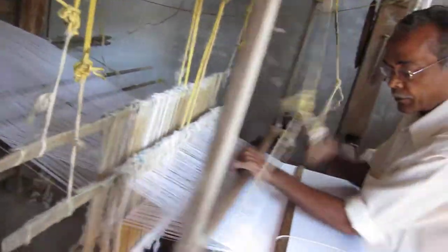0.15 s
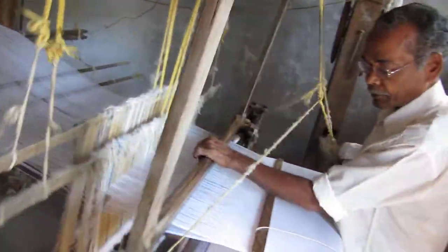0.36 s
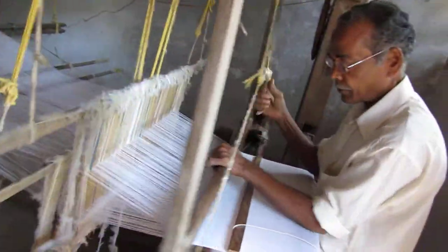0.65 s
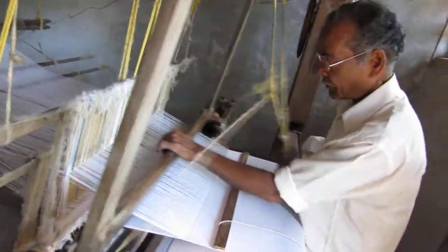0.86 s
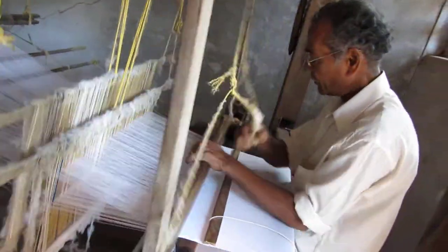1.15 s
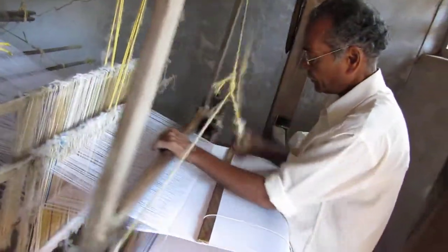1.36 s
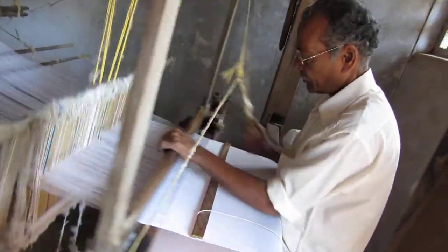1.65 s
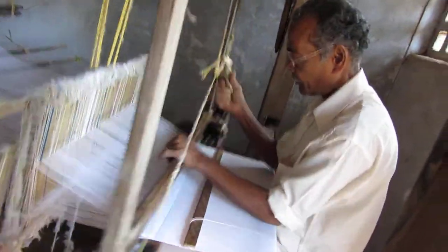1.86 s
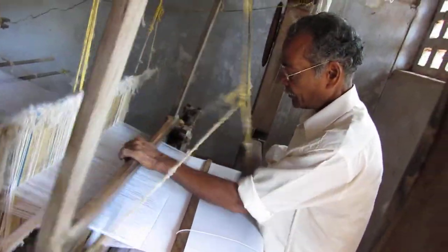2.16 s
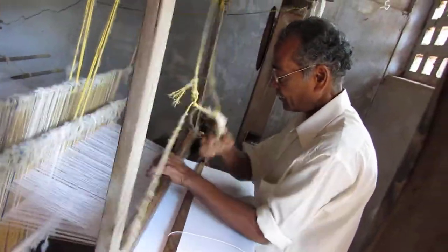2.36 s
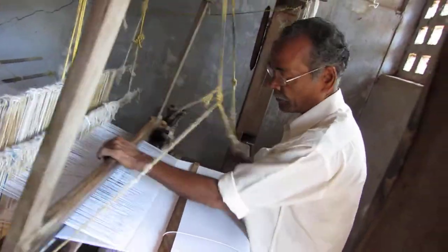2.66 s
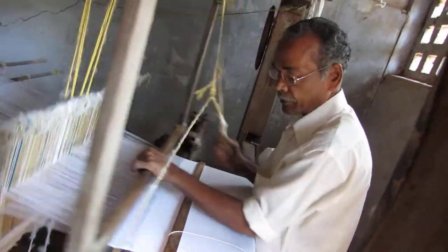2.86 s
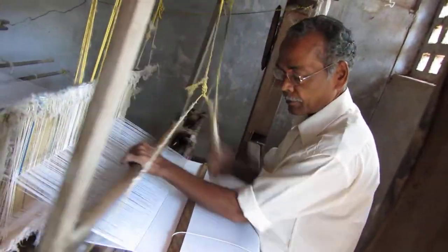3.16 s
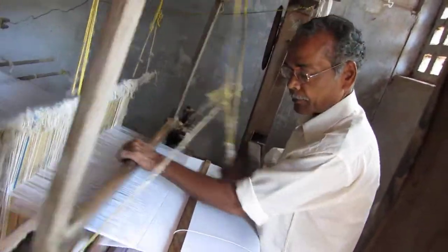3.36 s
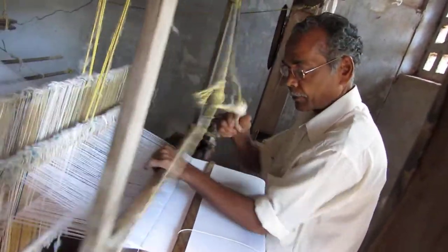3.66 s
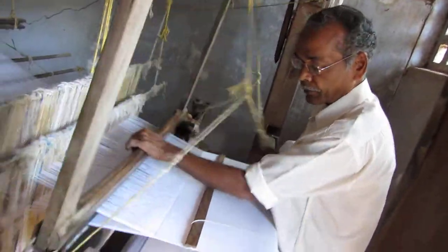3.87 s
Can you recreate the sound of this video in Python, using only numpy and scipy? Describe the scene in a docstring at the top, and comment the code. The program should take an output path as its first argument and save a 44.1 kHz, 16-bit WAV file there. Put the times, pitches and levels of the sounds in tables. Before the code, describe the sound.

Wooden handloom clacks in a steady cycle, shuttle cracking across, slamming, then rattling back

```python
"""A wooden fly-shuttle handloom in a small hard-walled room, one round trip of the shuttle every 1.2 s.
The picker cracks the shuttle across; it slams into the far box, which rings on.
The return throw knocks, scrapes and rattles, ends in a dry clack, and the warp rustles after it.
Ticks, creaks and treadle bumps fall in between; low noise and a hum run throughout.
Contacts are pushes, filtered noise bursts and decaying modes; the room is noise that follows them by band."""
import sys
import numpy as np
from scipy import signal
from scipy.fft import rfft, irfft
from scipy.io import wavfile

SR = 44100
rng = np.random.default_rng(int(sys.argv[2]) if len(sys.argv) > 2 else 0)


def transcribe(signal):
    """Save signal, clipped to [-1, 1], as a 16-bit WAV file at the path in sys.argv[1]."""
    frames = np.atleast_2d(signal).T
    limited = np.clip(frames, -1, 1)
    pcm = np.round(limited * 32767).astype(np.int16)
    wavfile.write(sys.argv[1], SR, pcm)


N = 176400
T = np.arange(N) / SR

# Outward throws. Each row: time in s, level in dB, delay until the picker meets its stop in s,
# level of that stop in dB.
THROWS = [(0.233, -20.5, 0.0058, -19.5), (1.4174, -22.5, 0.0059, -22), (2.6127, -20, .0057, -23),
          (3.7972, -21, 0.0059, -20)]
# Shuttle slams into the far box. Each row: time in s, level in dB, lead of the first touch in s,
# delay until it wedges in s, level of wedging in dB, tilt in dB per octave, pitch of the box in Hz,
# level of the box ring in dB.
SLAMS = [(0.4043, -18.5, 0.0024, 0.0046, -20, -2.5, 1906, -32.5),
         (1.5883, -14.5, 0.0026, 0.0032, -19.5, 0.5, 1931, -27),
         (2.7852, -15.5, 0.0029, .007, -17, -0.5, 2085, -34),
         (3.9685, -14.5, 0.0042, 0.004, -13.5, 0, 1803, -25)]
# Shuttle rebounds in the far box. Each row: time in s, level in dB.
REBOUNDS = [(0.466, -31.5), (0.494, -32), (1.619, -23), (1.633, -29), (1.645, -31), (2.831, -36),
            (2.88, -34)]
# Shuttle lands in the home box. Each row: time in s, level in dB, lead of the first touch in s.
LANDINGS = [(1.0232, -16.5, .002), (2.2145, -17, .0024), (3.3989, -18.5, 0.0023)]
# Return throws, shuttle chattering along the race. Each row: start in s, length in s, level in dB.
RETURNS = [(.809, .105, -34), (1.996, .112, -31.5), (3.188, .11, -32.5)]
# Shuttle scrapes the reed in the return throw. Each row: time in s, level in dB.
SCRAPES = [(0.8098, -30), (0.82, -31), (0.824, -28), (0.8423, -25), (0.865, -27), (0.906, -26),
           (1.982, -33), (1.999, -27.5), (2.006, -28), (2.012, -24), (2.042, -26), (2.051, -26),
           (2.077, -24), (2.088, -24.5), (2.095, -25.5), (3.188, -25.5), (3.196, -25), (3.201, -22),
           (3.232, -26.5), (3.245, -31.5), (3.276, -27), (3.283, -28)]
# Picker and sley knocks in the return throw. Each row: time in s, level in dB, pitch in Hz.
KNOCKS = [(0.7908, -27, 1130), (0.8157, -23.5, 1190), (0.8565, -25, 1260), (0.8652, -22, 1070),
          (0.8743, -30, 1480), (1.977, -25.5, 1160), (2.0028, -20.5, 1186), (2.0502, -20, 1127),
          (2.0636, -26.5, 1700), (3.168, -25, 1100), (3.1935, -21, 1250), (3.234, -22.5, 1330),
          (3.2425, -19.5, 1160)]
# Heddle sticks and cords tick. Each row: time in s, level in dB, tilt in dB per octave.
TICKS = [(.018, -38, 4.5), (0.105, -32, 4.5), (0.116, -35, 2.5), (.307, -45, 17), (.602, -37.5, 2),
         (0.772, -38.5, 0), (1.196, -38.5, 2), (1.228, -37, -1.5), (1.315, -56, 9), (2.601, -40, 0),
         (1.255, -47, 4), (1.266, -43.5, 3), (1.954, -35, 1), (2.393, -37.5, 0.5), (2.454, -40.5, 3),
         (2.467, -42, -5.5), (2.513, -46.5, 3), (3.147, -35.5, 1.5), (3.534, -33, -1), (3.557, -35.5, 1),
         (3.581, -38.5, 2.5), (3.6642, -32, 2.5), (3.679, -41.5, 2), (3.742, -47.5, 5)]
# Brief creaks of the frame. Each row: time in s, centre in Hz, level in dB.
CREAKS = [(.108, 676, -35), (1.199, 2420, -40.5), (2.548, 423, -47), (3.543, 1250, -35.5)]
# Treadle bumps. Each row: start in s, level in dB before the rise and decay.
BUMPS = [(.115, -52), (.30, -55), (1.64, -45), (2.05, -36), (2.45, -54), (2.864, -42)]

# Spectra of the struck parts and of the noise floor. Each row: frequency in Hz, relative level in dB.
PICKER_SPECTRUM = [(30, -51), (50, -38), (90, -23.5), (200, -15.5), (330, -9), (560, -16.5), (800, -9.5),
                   (1560, -3.5), (2380, -8.5), (2950, -0.5), (4100, -13), (5500, -13), (7900, -16),
                   (12500, -32.5), (14600, -26), (16000, -51)]
FAR_BOX_SPECTRUM = [(35, -74), (80, -41), (460, -22), (690, -13), (960, -9.5), (1220, -3.5), (1630, -5),
                    (1900, 2), (2430, -13), (2650, 0), (3320, -6.5), (3790, -0.5), (4150, -7.5),
                    (6100, -4.5), (9000, -15), (12000, -26.5), (14500, -31), (16000, -45)]
HOME_BOX_SPECTRUM = [(47, -52), (80, -35), (270, -16.5), (520, -21.5), (900, -2), (1200, -1.5), (1450, 0),
                     (1860, 2), (2450, -1), (3100, -2), (4140, -7.5), (7700, -11.5), (10700, -21.5),
                     (12000, -42), (14300, -28), (16000, -26)]
SLEY_SPECTRUM = [(47, -87), (80, -29), (136, -16), (242, -20.5), (369, -8.5), (441, -18.5), (1170, -1.5),
                 (1600, -4.5), (3170, -4), (4620, -19.5), (5900, -10), (12800, -44), (14300, -53),
                 (16000, -60)]
RACE_SPECTRUM = [(100, -32), (400, -12), (1100, -5.5), (1700, 0.5), (2900, -1), (4300, -9), (5900, -11),
                 (8000, -19.5), (12000, -34), (16000, -43)]
STICKS_SPECTRUM = [(100, -16), (600, 1.5), (1300, 7), (2800, 0.5), (4500, -11), (7000, -13.5),
                   (11000, -35.5), (16000, -53)]
TREADLE_SPECTRUM = [(30, -64), (70, -27), (110, -18), (145, -3), (200, -14), (280, -11), (450, -10),
                    (900, -28), (4000, -54)]
FLOOR_SPECTRUM = [(25, -41), (38, -43), (50, -7), (62, -9.5), (100, -4), (200, 0), (400, -3.5),
                  (1000, -2.5), (2500, -8.5), (6000, -22), (16000, -41.5)]

# Clear modes of a contact. Each row: frequency in Hz, energy relative to push and crack in dB, t60 in s.
PICKER_MODES = [(800, -16.5, 0.089), (1430, -11, 0.02), (1700, -10.5, 0.018), (2080, -9.5, 0.0073),
                (3130, -21, 0.0092)]
FAR_MODES = [(1245, -31, 0.085), (1437, -24, 0.13), (1738, -10.5, 0.021), (1966, -10.5, 0.039),
             (2690, -13.5, 0.065), (3323, -6.5, 0.02), (3660, -14.5, 0.029)]
HOME_MODES = [(1300, -19, 0.19), (1873, 9, 0.016), (2080, -8, 0.031), (2680, 6, 0.098)]
SLEY_MODES = [(793, -15, 0.036), (1110, -8.5, 0.034), (1174, -14, 0.065), (1280, -17, 0.044),
              (1716, -1.5, 0.052)]
# Long ring of the boxes after each arrival. Each row: frequency in Hz, level in dB re the ring level, t60 in s.
ARRIVAL_RING = [(599, -17.5, 1), (980, -11.5, 0.63), (1045, -11, 0.54), (1157, -5, 0.38), (1222, -3, 0.7),
                (1263, -2.5, 0.46), (1753, -12, 1), (2720, -9.5, 0.68), (3680, -17, 0.68), (5760, -15, 0.64)]
# Far box with the shuttle wedged in it. Each row: multiple of its pitch, level in dB re its ring, t60 in s.
BOX_RING = [(1, -0.5, 0.44), (2.928, -6.5, 0.37), (3.22, -17, 0.65)]

# Room decay. Each row: frequency in Hz, t60 in s.
ROOM_T60 = [(150, 0.3), (500, 0.78), (1200, 0.83), (3000, 0.51), (7000, 0.5), (15000, 0.14)]
# Room strength. Each row: frequency in Hz, gain in dB.
ROOM_GAIN = [(100, 1), (190, 3), (260, -1.5), (350, 1.5), (600, 4.5), (850, -0.5), (1200, -4.5), (3000, -4),
             (6000, -4.5), (10000, -10.5), (16000, -4)]
# Likeness of the two channels in scattered sound. Each row: frequency in Hz, correlation.
LIKENESS = [(40, 0.31), (150, 0.89), (500, 0.84), (1000, 0.6), (2000, 0.5), (4000, 0.012), (8000, 0.04),
            (16000, .1)]

RING_SLAM_DB, RING_LANDING_DB = -30, -33.5
RING_SPLIT_AT_1KHZ_HZ = 11  # rms spread of a mode group
EARLY_SHARE, EARLY_DB, ROOM_DELAY_S = 0.23, -1.5, 0.0036  # early t60 as a share of the tail's
PORT_LAG_S, LAG_SCATTER = 0.000052, 0.65  # scatter as a share of the lag
FLOOR_DB, HUM_HZ, HUM_DB = -48.5, 155, -57
TOP_HZ = 16200


def amp(db):
    """dB to amplitude."""
    return 10 ** (np.asarray(db) / 20)


def curve(points, hz):
    """Read (Hz, value) points on a log-frequency axis."""
    p = np.array(points, float)
    return np.interp(np.log(hz + 1), np.log(p[:, 0]), p[:, 1])


def unit(x):
    """Scale to unit energy per channel."""
    return x / np.sqrt(np.mean(np.sum(x ** 2, axis=-1)) + 1e-18)


def unit_rms(x):
    """Scale to rms 1 over the whole signal."""
    return unit(x) * np.sqrt(x.shape[-1])


def unit_10ms(x):
    """Scale to the energy of 10 ms at rms 1."""
    return unit(x) * np.sqrt(SR / 100)


def fade(t, t60_s):
    """Exponential decay, -60 dB at t60."""
    return np.exp(-np.log(1000) * t / max(t60_s, 1e-4))


def colour(x, spectrum, tilt_db=0):
    """Minimum-phase filter with the given spectrum, tilted per octave about 2 kHz, untilted slope below 500 Hz."""
    n = x.shape[-1]
    hz = np.arange(n // 2 + 1) * SR / n
    db = curve(spectrum, hz) + tilt_db * np.log2(np.maximum(hz, 500) / 2000)
    cepstrum = irfft(np.log(amp(db)), n)
    cepstrum[1:n // 2] *= 2  # fold onto positive time
    cepstrum[n // 2 + 1:] = 0
    return irfft(rfft(x) * np.exp(rfft(cepstrum)), n)


def diffuse(n):
    """Stereo noise, most alike in the low mids and nearly unrelated in the treble."""
    mid, side = rfft(rng.standard_normal((2, n)))
    c = np.clip(curve(LIKENESS, np.arange(len(mid)) * SR / n), -.99, .99)
    mid, side = mid * np.sqrt(1 + c), side * np.sqrt(1 - c)
    return irfft(np.array([mid + side, mid - side]), n) / np.sqrt(2)


def ports(x):
    """Direct sound usually reaches the left port just before the right; the lag varies per contact."""
    hz = np.arange(len(x) // 2 + 1) * SR / len(x)
    lag_s = PORT_LAG_S * (1 + LAG_SCATTER * rng.standard_normal())
    right = irfft(rfft(x) * np.exp(-2j * np.pi * hz * lag_s), len(x))
    return np.array([x, right])


def add(track, start_s, sound):
    """Mix a sound into the track at a time."""
    i = int(np.clip(start_s * SR, 0, N - 1))
    track[:, i:i + sound.shape[1]] += sound[:, :N - i]


def contact(spectrum, modes, crack_t60_s, ring_t60_s, ring_db, tilt_db=0,
            push_db=-60, push_s=0.00021, size=16384):
    """One wood-on-wood contact: a push, a crack, the frame's dense ring and clear modes; rms 1 over 10 ms."""
    t = T[:size]
    push = t / push_s * np.exp(-4 * t / push_s)
    force = amp(push_db) * unit(colour(ports(push), spectrum, tilt_db))
    burst = rng.standard_normal(size) * fade(t, crack_t60_s)
    crack = unit(colour(ports(burst), spectrum, tilt_db))
    ring = unit(colour(diffuse(size) * fade(t, ring_t60_s), spectrum, tilt_db))
    out = unit(force + crack) + amp(ring_db) * ring
    for hz, db, t60_s in modes:
        detune, phase, spread = rng.standard_normal(3)
        right_phase = spread * .5 - 2 * np.pi * hz * PORT_LAG_S
        phases = np.pi * phase + np.array([[0], [right_phase]])
        wave = np.sin(2 * np.pi * hz * (1 + 0.0054 * detune) * t + phases)
        envelope = fade(t, t60_s) * (1 - fade(t, 0.013))
        out = out + amp(db) * unit(wave * envelope)
    return unit_10ms(out * (1 - t / t[-1]))


def knock(hz, rise_s, t60_s, size=16384):
    """A blunt blow: a few cycles of one strongly damped wood mode; rms 1 over 10 ms."""
    t = T[:size]
    envelope = (1 - np.exp(-(t / rise_s) ** 2)) * fade(t, t60_s)
    return unit_10ms(ports(np.gradient(np.sin(2 * np.pi * hz * t) * envelope)))


def clicks(per_s, scatter_db, t60_s):
    """A random train of short scuffs of uneven size; rms near 1."""
    chance, size = rng.random(N), rng.standard_normal(N)
    train = (chance < per_s / SR) * amp(scatter_db * np.clip(size, -2, 2))
    power = signal.lfilter([1], [1, -fade(2 / SR, t60_s)], train ** 2)
    return diffuse(N) * np.sqrt(power / power.mean())


def throws(lead_s=0.005, lead_db=-9, slack_s=0.0044, slack_db=-16,
           bounce_s=0.002, bounce_db=-1, recoil_s=0.00126, recoil_db=-4):
    """The picker touches, takes up slack, hits the shuttle, bounces, cracks against its stop and recoils."""
    out = np.zeros((2, N))
    for s, db, stop_s, stop_db in THROWS:
        slack = contact(PICKER_SPECTRUM, [], crack_t60_s=.02, ring_t60_s=.03, ring_db=0, tilt_db=-2)
        add(out, s - slack_s, amp(db + slack_db) * slack)
        hits = [(s - lead_s, db + lead_db), (s, db), (s + bounce_s, db + bounce_db),
                (s + stop_s, stop_db), (s + stop_s + recoil_s, stop_db + recoil_db)]
        for at_s, level_db in hits:
            hit = contact(PICKER_SPECTRUM, PICKER_MODES, crack_t60_s=0.0051, ring_t60_s=0.014,
                          ring_db=-2.5, push_db=-1.5)
            add(out, at_s, amp(level_db) * hit)
    return out


def slams(touch_db=-9.0, touch_hz=1600):
    """The shuttle touches the far box with a blunt knock, hits its end, wedges and rebounds."""
    out = np.zeros((2, N))
    for s, db, lead_s, wedge_s, wedge_db, tilt_db, _, _ in SLAMS:
        touch = knock(touch_hz, rise_s=.0008, t60_s=.022)
        frame = contact(FAR_BOX_SPECTRUM, [], crack_t60_s=0.0045, ring_t60_s=0.035,
                        ring_db=9.5, tilt_db=-3.5)
        add(out, s - lead_s, amp(db + touch_db) * (touch + amp(-7.5) * frame))
        hit = contact(FAR_BOX_SPECTRUM, FAR_MODES, crack_t60_s=.009, ring_t60_s=.045,
                      ring_db=-4, tilt_db=tilt_db, push_db=3)
        add(out, s, amp(db) * hit)
        wedge = contact(FAR_BOX_SPECTRUM, FAR_MODES, crack_t60_s=0.014, ring_t60_s=0.15,
                        ring_db=0, tilt_db=tilt_db)
        add(out, s + wedge_s, amp(wedge_db) * wedge)
    for s, db in REBOUNDS:
        rebound = contact(FAR_BOX_SPECTRUM, SLEY_MODES, crack_t60_s=.008, ring_t60_s=.03,
                          ring_db=-3, tilt_db=-4, push_db=0)
        add(out, s, amp(db) * rebound)
    return out


def landings(touch_db=-7, bounce_s=0.0015, bounce_db=-5):
    """A sharp tick, a dry clack and a bounce in the home box."""
    out = np.zeros((2, N))
    for s, db, lead_s in LANDINGS:
        tick = contact(HOME_BOX_SPECTRUM, [], crack_t60_s=0.018, ring_t60_s=0.059,
                       ring_db=-15, tilt_db=0.5)
        add(out, s - lead_s, amp(db + touch_db) * tick)
        clack = contact(HOME_BOX_SPECTRUM, [], crack_t60_s=0.011, ring_t60_s=0.031, ring_db=-1, push_db=10)
        add(out, s, amp(db) * clack)
        bounce = contact(HOME_BOX_SPECTRUM, HOME_MODES, crack_t60_s=0.014, ring_t60_s=0.02,
                         ring_db=11.5, tilt_db=-2)
        add(out, s + bounce_s, amp(db + bounce_db) * bounce)
    return out


def knocks(rise_s=0.000935, t60_s=0.0042, body_db=-5):
    """Blunt knocks of picker and sley, each at its own pitch, with a short ring of the frame."""
    out = np.zeros((2, N))
    for s, db, hz in KNOCKS:
        add(out, s, amp(db) * knock(hz, rise_s, t60_s))
        body = contact(SLEY_SPECTRUM, SLEY_MODES, crack_t60_s=.01, ring_t60_s=.035, ring_db=0, tilt_db=-4)
        add(out, s + rise_s, amp(db + body_db) * body)
    return out


def returns(attack_s=0.002, release_t60_s=0.092, chatter_cut_hz=380):
    """The return throw: the shuttle scrapes the reed in short bursts and chatters on the race."""
    out = np.zeros((2, N))
    for s, db in SCRAPES:
        scrape = contact(RACE_SPECTRUM, [], crack_t60_s=.024, ring_t60_s=.07,
                         ring_db=-2, tilt_db=.7, push_db=-9)
        add(out, s, amp(db) * scrape)
    effort = np.zeros(N)
    for s, length_s, db in RETURNS:
        rise = np.clip((T - s) / attack_s, 0, 1)
        effort += amp(db) * rise * fade(np.maximum(T - s - length_s, 0), release_t60_s)
    chatter = colour(clicks(per_s=350, scatter_db=3, t60_s=0.014), SLEY_SPECTRUM, tilt_db=1.5)
    high_pass = signal.butter(1, chatter_cut_hz, "high", fs=SR, output="sos")
    return out + effort * unit_rms(signal.sosfilt(high_pass, chatter))


def ringing(size=32768, count=5):
    """Close groups of box modes beat as they die; the far box also rings at a pitch set by how the shuttle
    wedges."""
    out, t = np.zeros((2, N)), T[:size]
    rings = []
    for arrivals, ring_db in [(SLAMS, RING_SLAM_DB), (LANDINGS, RING_LANDING_DB)]:
        rings += [(row[0], hz, ring_db + db, t60_s) for row in arrivals for hz, db, t60_s in ARRIVAL_RING]
    for s, *_, box_hz, box_db in SLAMS:
        rings += [(s, box_hz * ratio, box_db + db, t60_s) for ratio, db, t60_s in BOX_RING]
    for s, hz, db, t60_s in rings:
        detune, phase, spread = rng.standard_normal((3, count, 1))
        split_hz = RING_SPLIT_AT_1KHZ_HZ * np.sqrt(hz / 1000) * detune
        waves = np.exp(2j * np.pi * ((hz + split_hz) * t + phase))
        right = waves * np.exp(1j * spread * hz / 2000)
        pair = np.array([waves.sum(0), right.sum(0)]).imag
        decay = fade(t, t60_s)
        add(out, s, amp(db) * unit(pair * decay) * np.linalg.norm(decay))
    return out


def heddles(rustle_db=-46, delay_s=0.017, length_s=0.35):
    """Sticks tick, and the warp rustles while the shed changes after each landing and at the start."""
    out = np.zeros((2, N))
    for s, db, tilt_db in TICKS:
        tick = contact(STICKS_SPECTRUM, [], crack_t60_s=0.029, ring_t60_s=0.06, ring_db=-1.5, tilt_db=tilt_db)
        add(out, s, amp(db) * tick)
    motion = np.zeros(N)
    for start_s in [-.14] + [row[0] + delay_s for row in LANDINGS]:
        progress = np.clip((T - start_s) / length_s, 0, 1)
        motion += np.sqrt(np.abs(np.sin(np.pi * progress)))
    scuffs = clicks(per_s=160, scatter_db=0.5, t60_s=0.028)
    return out + amp(rustle_db) * motion * unit_rms(colour(scuffs, STICKS_SPECTRUM, tilt_db=-1.5))


def creaks(t60_s=0.056, size=16384):
    """A joint gives a little and rings briefly in a narrow band."""
    out = np.zeros((2, N))
    for s, hz, db in CREAKS:
        band = signal.butter(2, [hz * .9, hz * 1.1], "band", fs=SR, output="sos")
        burst = diffuse(size) * fade(T[:size], t60_s)
        add(out, s, amp(db) * unit_10ms(signal.sosfilt(band, burst)))
    return out


def treadles(attack_t60_s=0.015, decay_t60_s=0.69):
    """Soft low bumps through the frame: low noise with a quick rise and slow decay."""
    effort = np.zeros(N)
    for s, db in BUMPS:
        since_s = np.maximum(T - s, 0)
        effort += amp(db) * (1 - fade(since_s, attack_t60_s)) * fade(since_s, decay_t60_s)
    return effort * unit_rms(colour(diffuse(N), TREADLE_SPECTRUM))


def room(x, count=22):
    """Diffuse sound of loom and walls: per band, noise follows the sound's power with an early part and a tail."""
    hz = np.arange(N // 2 + 1) * SR / N
    centres_hz = np.geomspace(90, 15000, count)
    half_step = np.sqrt(centres_hz[1] / centres_hz[0])
    noise, out = rfft(diffuse(N)), 0
    for centre_hz, share in zip(centres_hz, np.eye(count)):
        edges_hz = [centre_hz / half_step, centre_hz * half_step]
        band_pass = signal.butter(2, edges_hz, "band", fs=SR, output="sos")
        power = np.mean(signal.sosfilt(band_pass, x) ** 2, axis=0)
        late_pole = fade(2 / SR, curve(ROOM_T60, centre_hz))
        early_pole = late_pole ** (1 / EARLY_SHARE)
        late = signal.lfilter([1 - late_pole], [1, -late_pole], power)
        early = signal.lfilter([1 - early_pole], [1, -early_pole], power)
        level = np.sqrt(late + amp(EARLY_DB) ** 2 * early)
        swell = np.interp(T - ROOM_DELAY_S, T, level, left=0)
        weight = curve(list(zip(centres_hz, share)), hz) * (hz > 60)  # triangle over log frequency
        band = unit_rms(irfft(noise * np.sqrt(weight), N))
        out = out + amp(curve(ROOM_GAIN, centre_hz)) * swell * band
    return out


def background(waver=0.21, waver_hz=5):
    """Low room noise and a hum wavering in level and phase."""
    low_pass = signal.butter(2, waver_hz, fs=SR, output="sos")
    drift = signal.sosfilt(low_pass, rng.standard_normal((2, N)))
    in_phase, quadrature = waver * unit_rms(drift)
    angle = 2 * np.pi * HUM_HZ * T
    hum = (1 + in_phase) * np.sin(angle) + quadrature * np.cos(angle)
    floor = unit_rms(colour(diffuse(N), FLOOR_SPECTRUM))
    return amp(FLOOR_DB) * floor + amp(HUM_DB) * np.sqrt(2) * hum


def scene():
    """Throws, slams, landings, rattle and ticks sound directly and through the room; the rest directly."""
    throw, slam, landing = throws(), slams(), landings()
    rattle, ticks = knocks() + returns(), heddles()
    send = amp(-7.5) * throw + amp(-5) * slam + amp(-6.5) * landing
    send = send + amp(-3.0) * rattle + amp(-6.5) * ticks
    direct = throw + slam + landing + rattle + ticks
    return direct + room(send) + ringing() + creaks() + treadles() + background()


def record(dry, ceiling=0.6, low_cut_hz=42):
    """Thin the deep bass, round the highest peaks and cut the top."""
    high_pass = signal.butter(4, low_cut_hz, "high", fs=SR, output="sos")
    dry = signal.sosfilt(high_pass, dry)
    soft = dry / (1 + (dry / ceiling) ** 4) ** .25
    low_pass = signal.ellip(8, .2, 70, TOP_HZ, fs=SR, output="sos")  # 0.2 dB ripple, 70 dB stop
    return signal.sosfilt(low_pass, soft)


dry = scene()
out = record(dry)
transcribe(out)
```